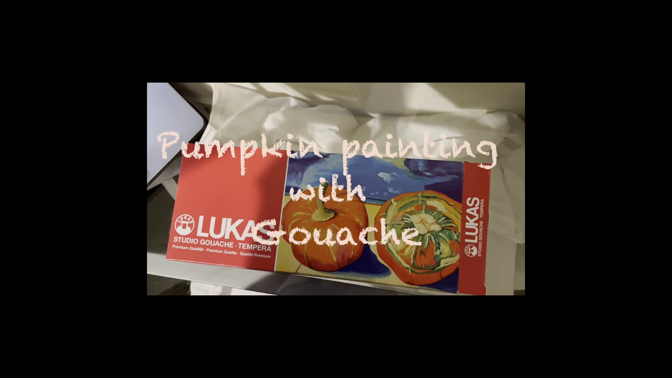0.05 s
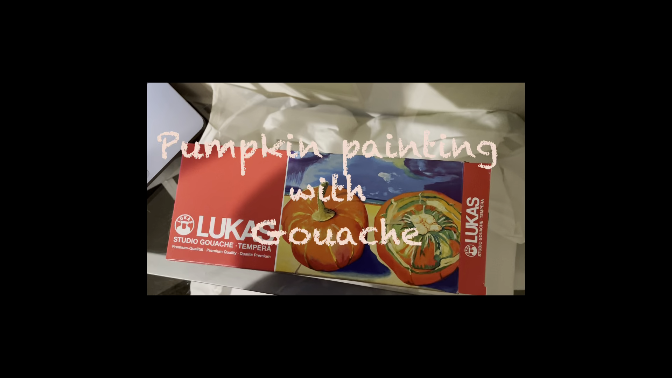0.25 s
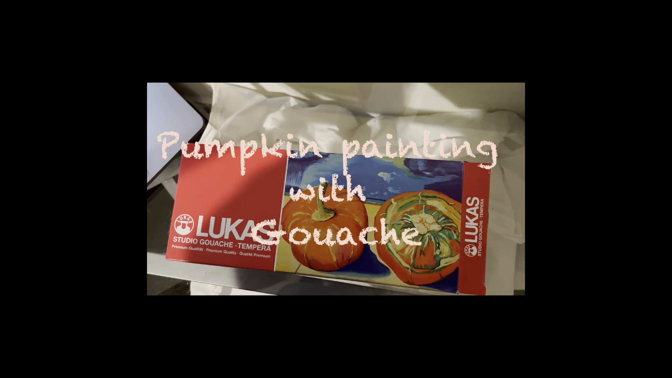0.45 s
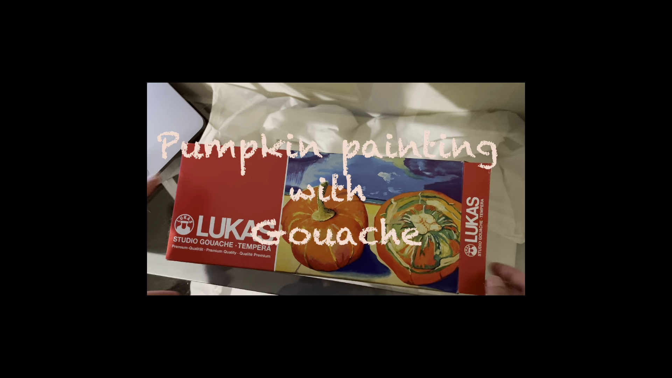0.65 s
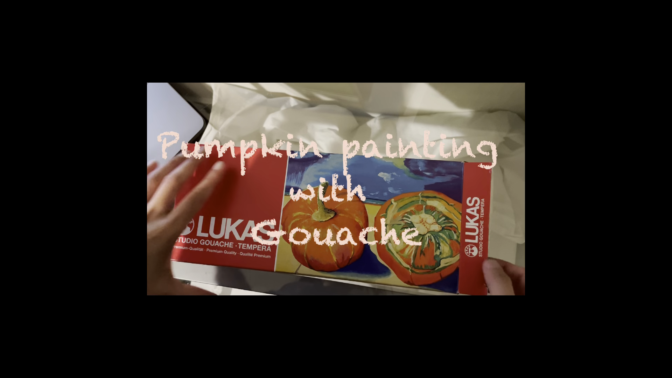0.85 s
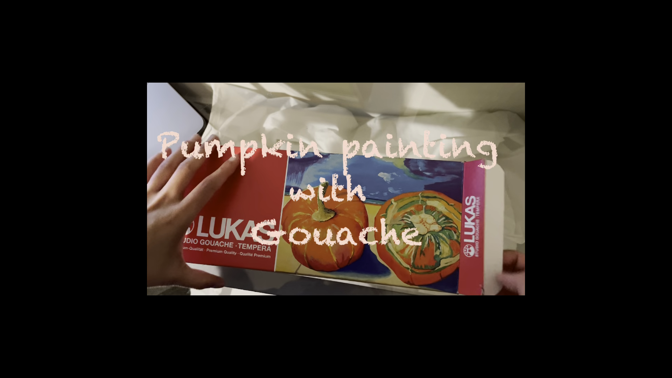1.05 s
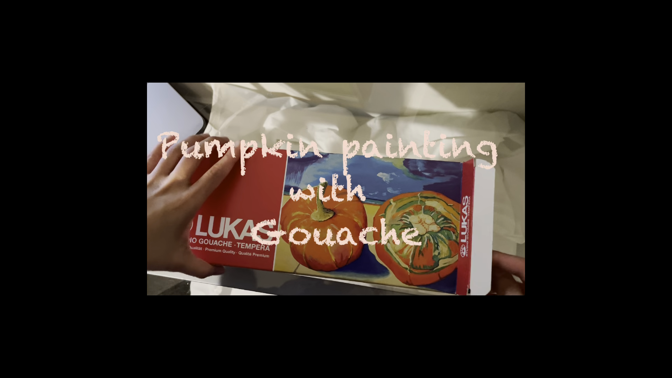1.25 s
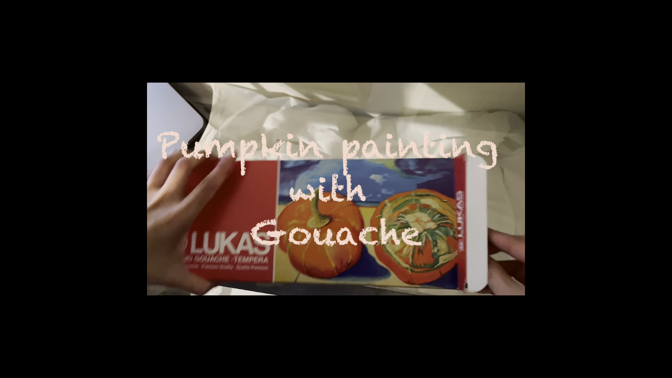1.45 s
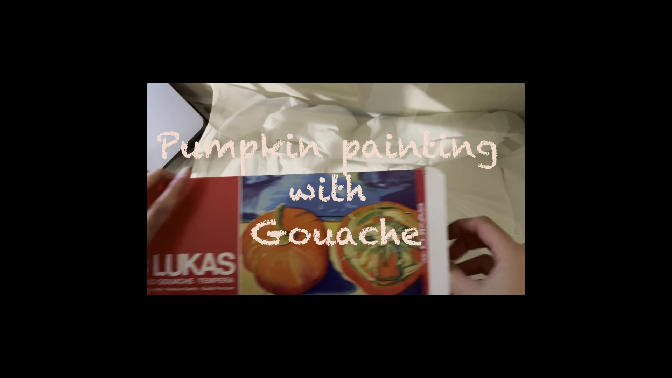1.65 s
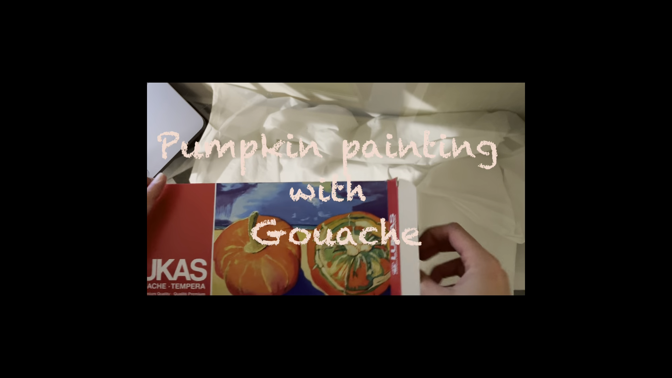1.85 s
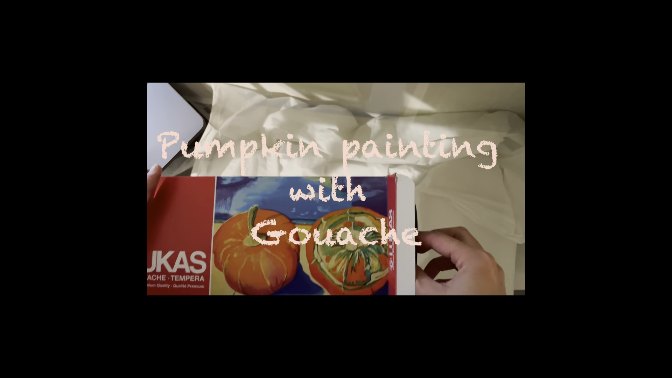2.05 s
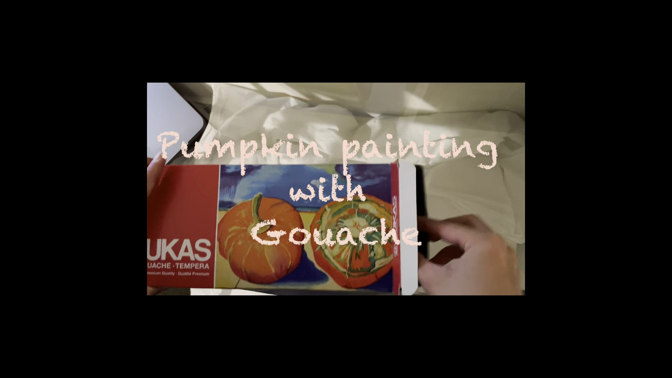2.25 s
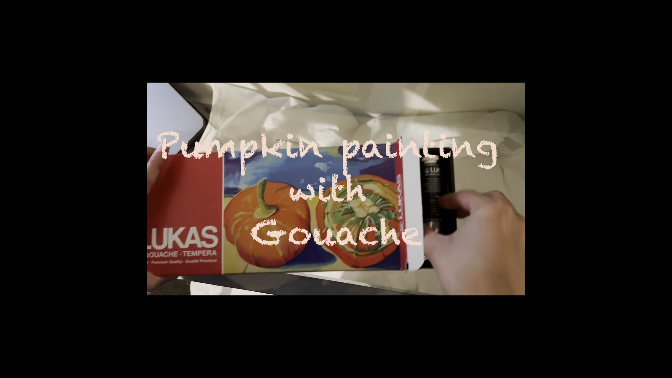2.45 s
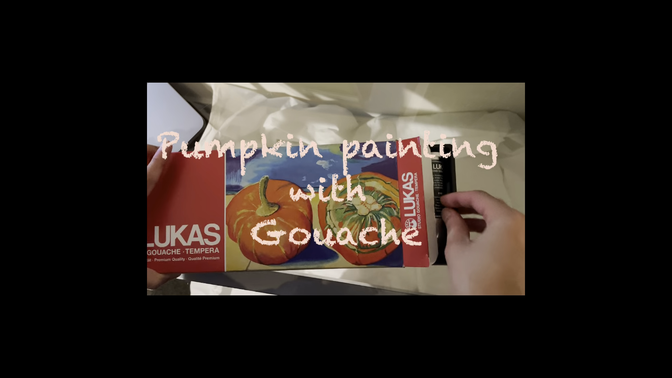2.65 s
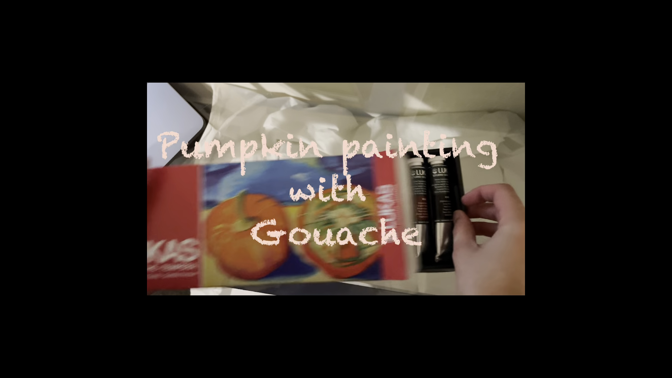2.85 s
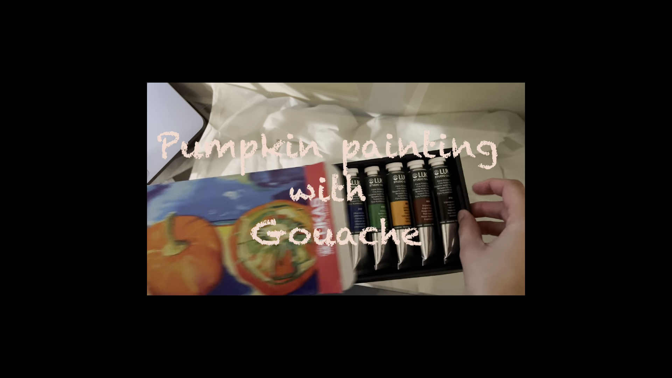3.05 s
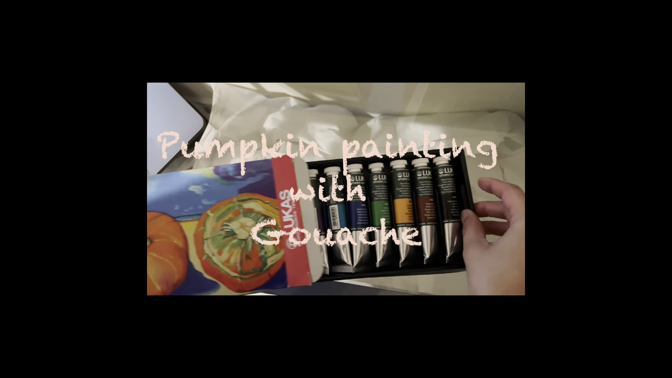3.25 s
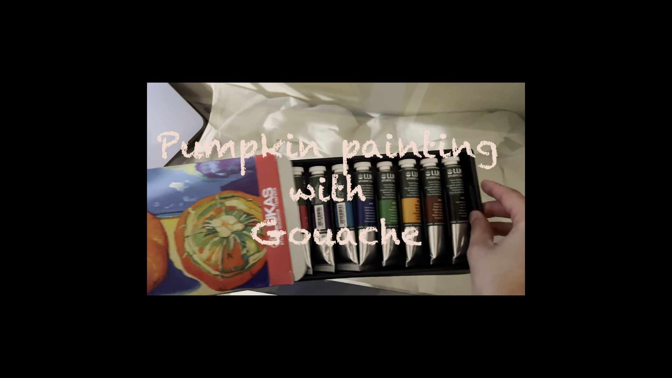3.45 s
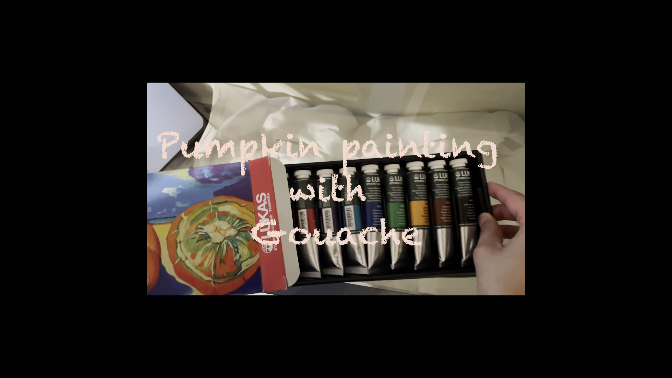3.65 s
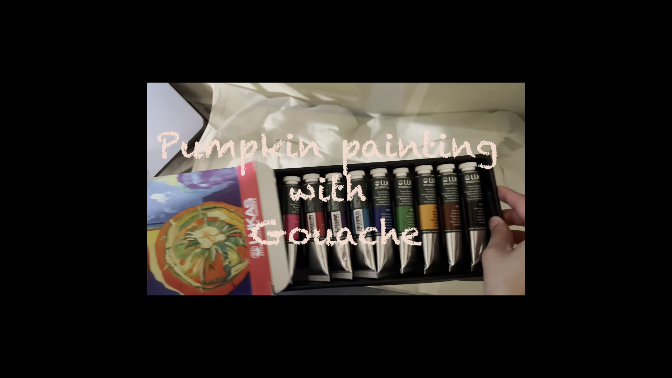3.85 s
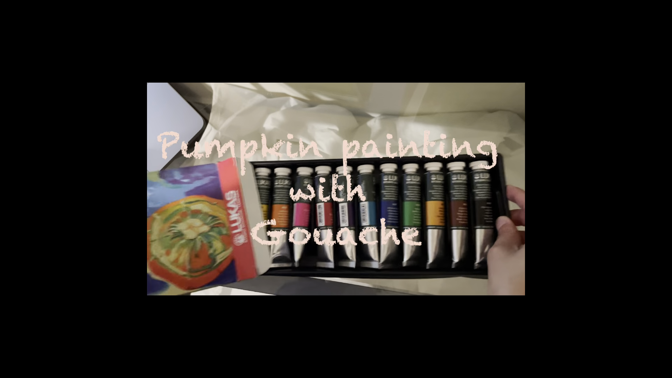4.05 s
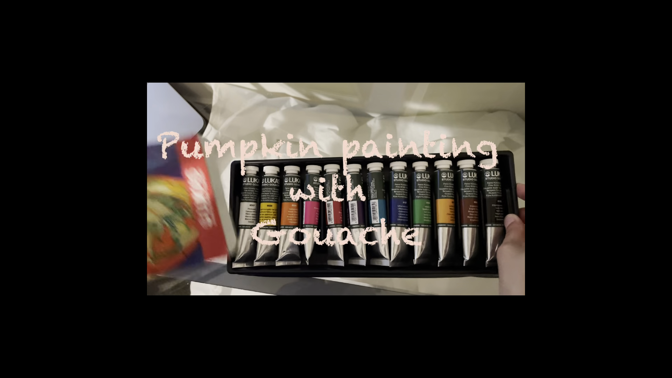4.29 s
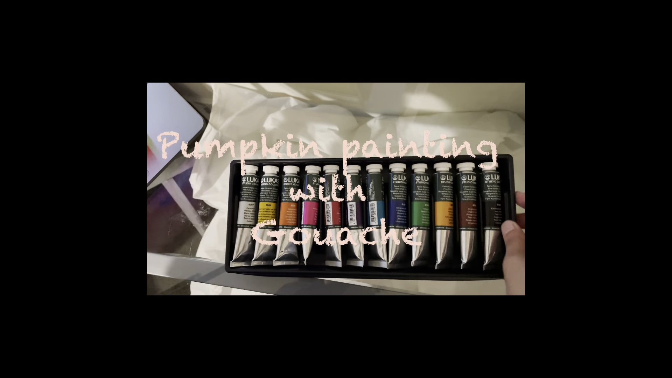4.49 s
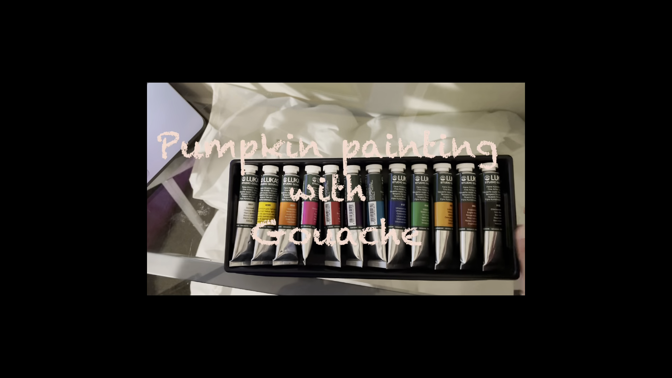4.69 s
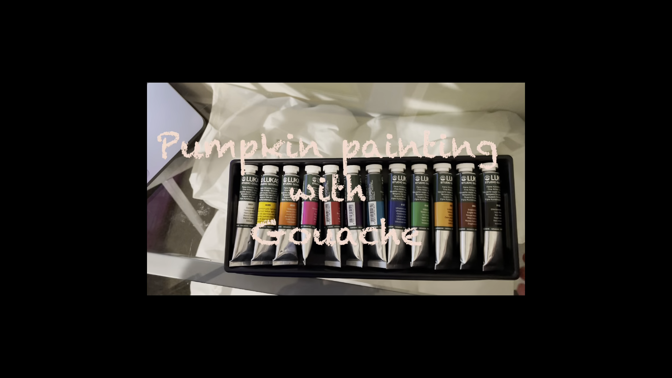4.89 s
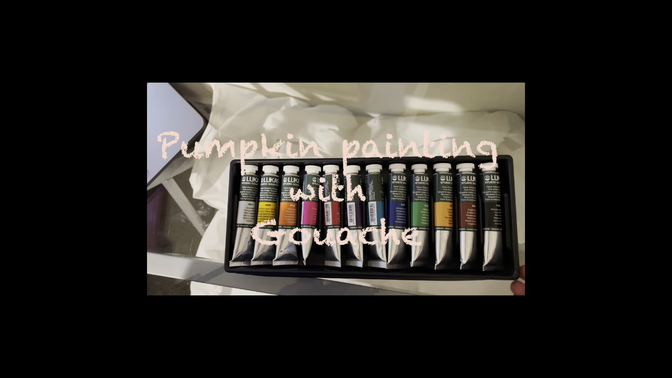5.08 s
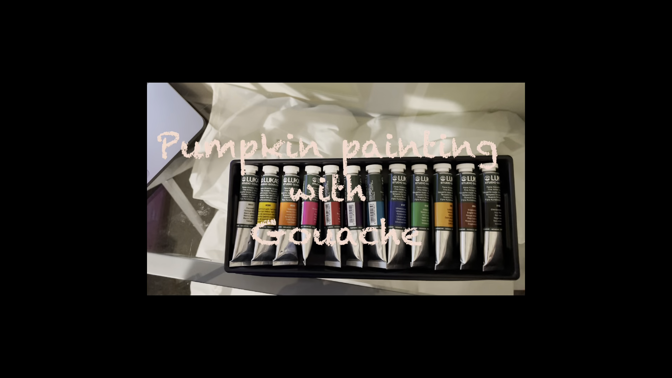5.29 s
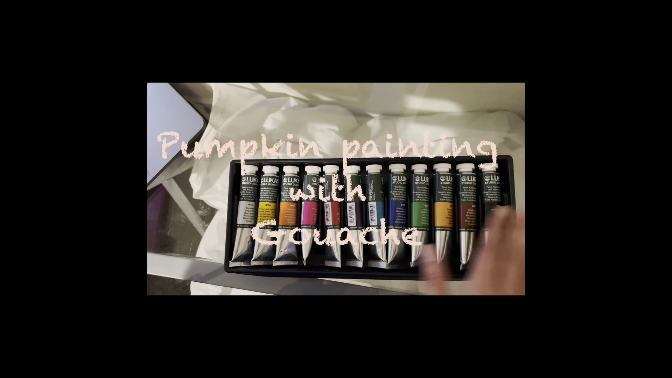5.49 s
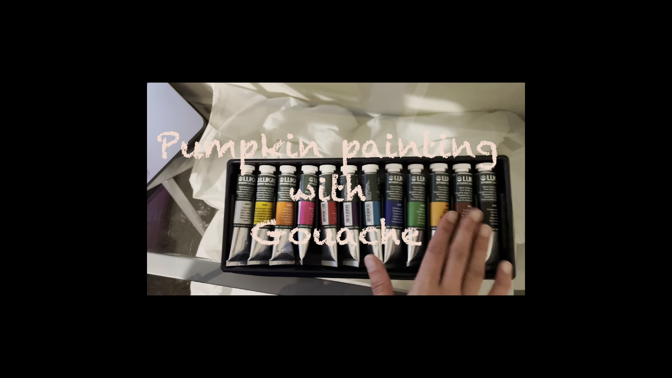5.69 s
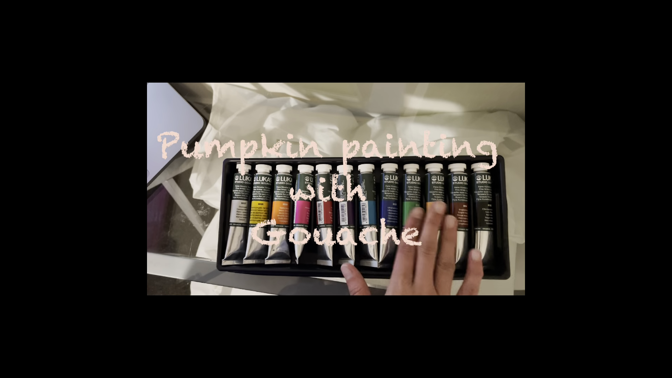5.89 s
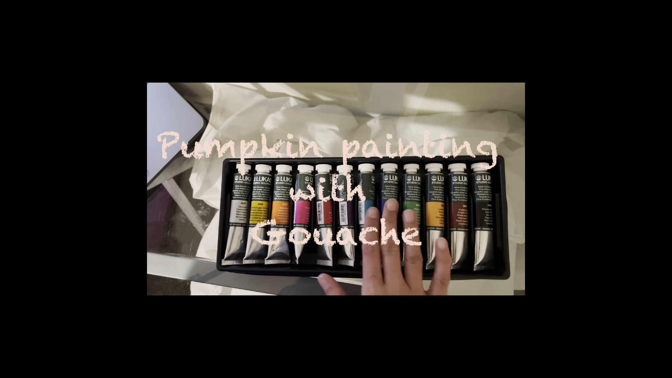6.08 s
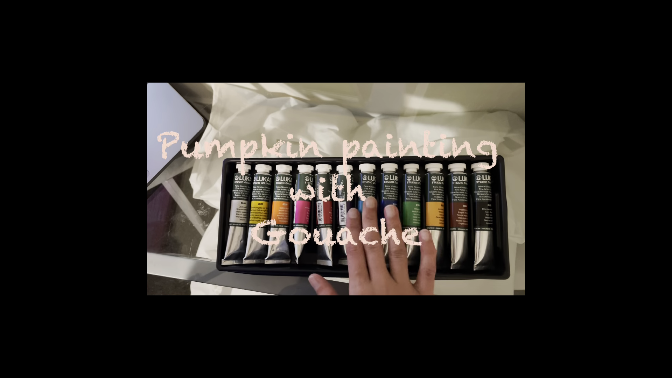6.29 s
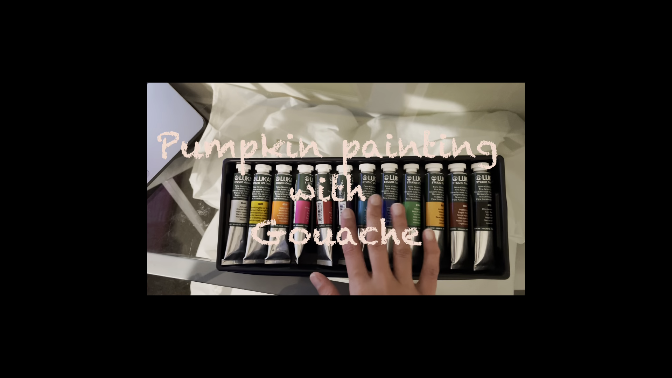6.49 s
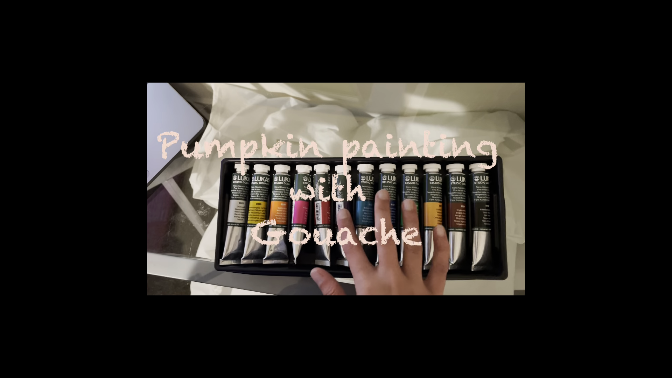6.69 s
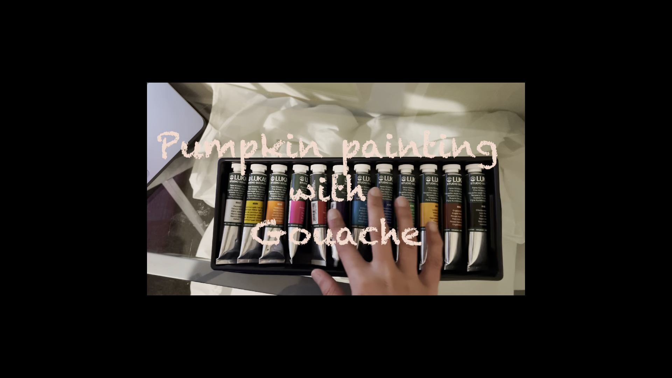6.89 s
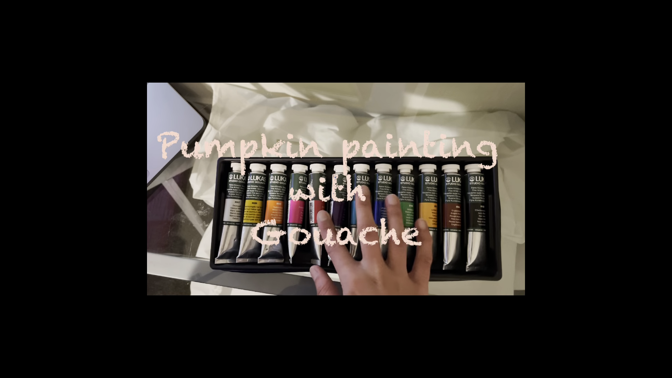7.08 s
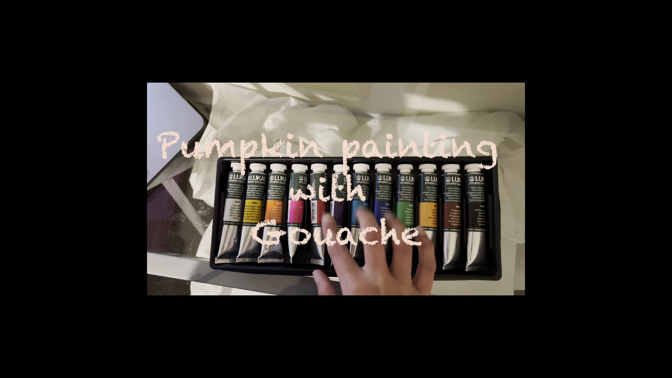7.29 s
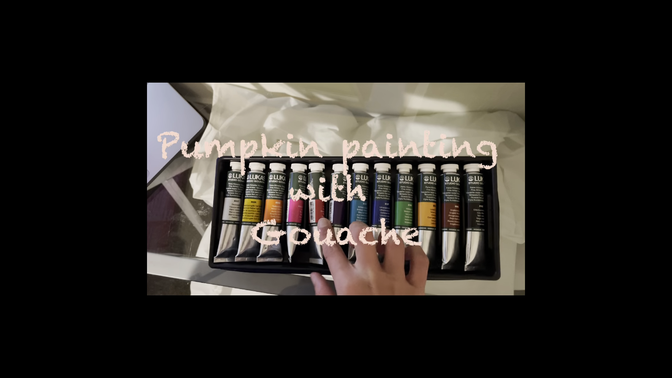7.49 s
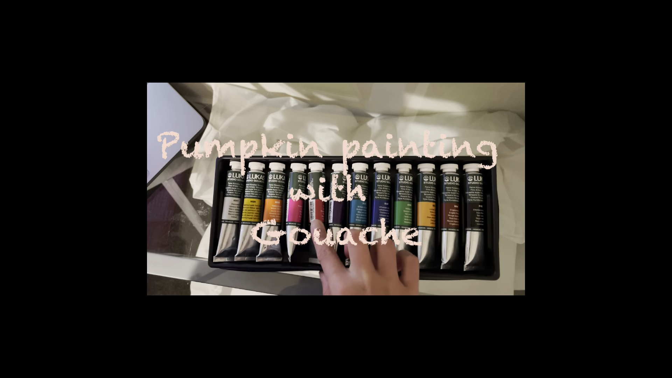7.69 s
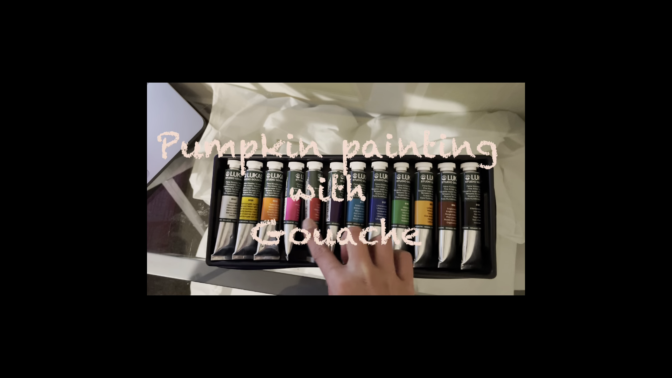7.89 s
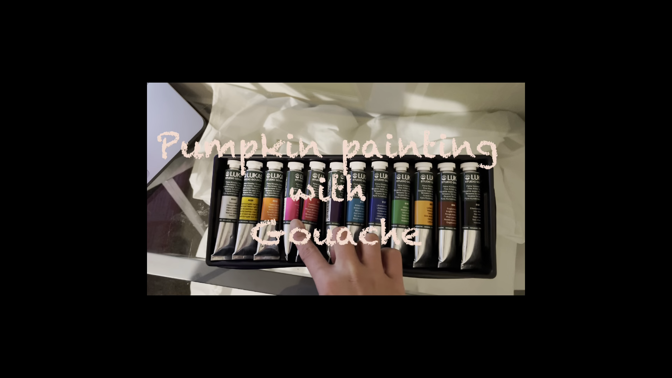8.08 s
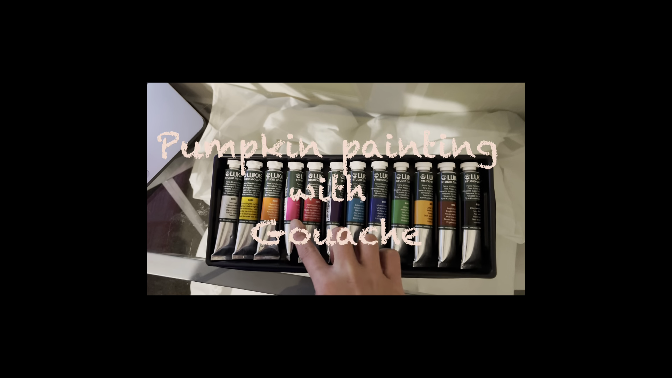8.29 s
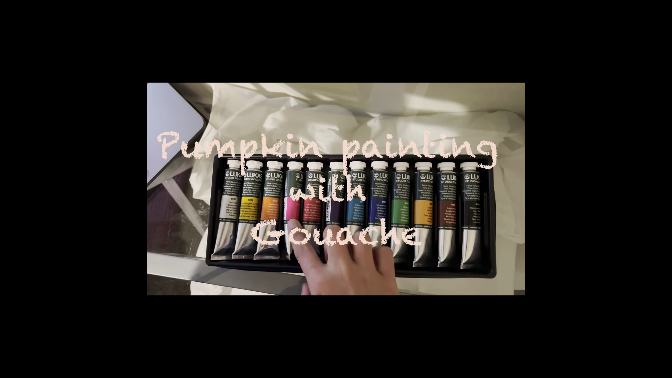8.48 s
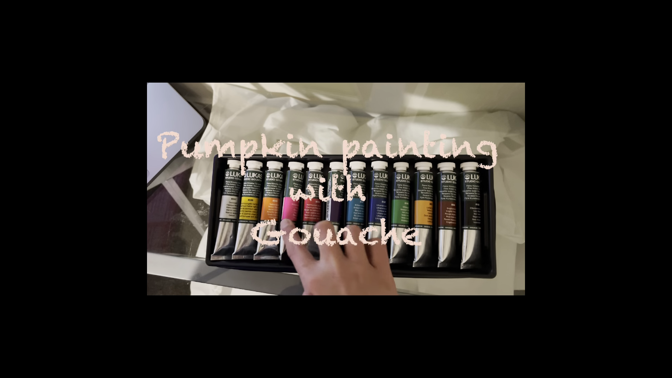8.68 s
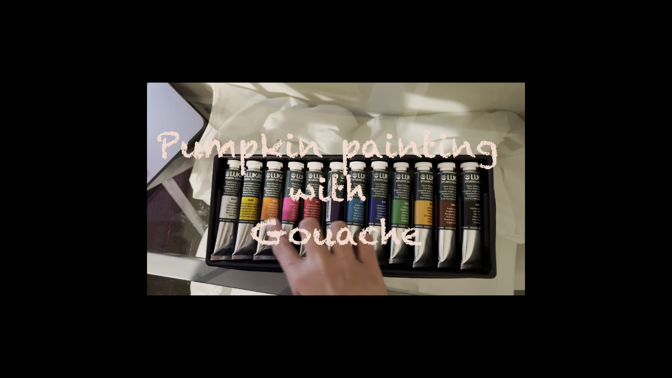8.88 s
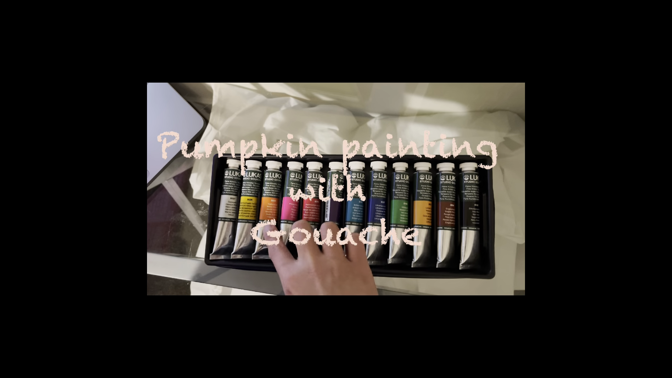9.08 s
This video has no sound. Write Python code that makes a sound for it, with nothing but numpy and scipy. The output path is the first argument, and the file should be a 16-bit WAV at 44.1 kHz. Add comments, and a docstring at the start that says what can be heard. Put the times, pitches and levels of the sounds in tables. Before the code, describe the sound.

Close to the microphone in a quiet room, a cardboard flap is worked open with soft rubbing and a few snaps. A tray of paint tubes is then dragged from the sleeve with a loud, uneven rasp that turns hollow, ending in several quick knocks. Afterwards come scattered light taps, clicks and faint finger squeaks on the tubes, one clacking into its slot, over low room tone and a brief faint hum.

```python
"""A cloth-covered table in a quiet room, one microphone close to the hands.
A plastic tray of paint tubes is pulled from its cardboard sleeve. The end flap is picked open; the
tray scrapes out in a few pulls, driving the panels of a sleeve that turns hollow, and knocks free.
Then fingers brush and squeak over the tubes and tap them in their slots, ringing tray and table.
Behind it lie a low room tone and, now and then, a faint hum."""
import sys
import numpy as np
from scipy import signal
from scipy.fft import rfft, irfft
from scipy.io import wavfile

SR = 44100
rng = np.random.default_rng(int(sys.argv[2]) if len(sys.argv) > 2 else 0)


def wav_record(signal):
    """Record a signal, one row per channel, as 16-bit PCM in the file named by sys.argv[1]."""
    frames = np.transpose(np.atleast_2d(signal))
    bounded = np.clip(frames, -1, 1)
    # unit amplitude maps onto the largest positive 16-bit level
    quanta = np.round(bounded * 32767).astype(np.int16)
    wavfile.write(sys.argv[1], SR, quanta)


N = 403074
TIME = np.arange(N) / SR

# taps on the tubes: t/s, knock level/dB, tick level/dB, ring f/Hz
TUBE_TAPS = [(4.473, -59, -57.5, 2960), (5.589, -50, -49, 4550), (5.68, -38.5, -32, 2030),
             (5.753, -52, -54, 2600), (5.853, -53.5, -61.5, 4050), (6.013, -48.5, -54, 3600),
             (6.024, -45.5, -61, 1010), (6.176, -40, -44.5, 963), (6.357, -70, -69, 6000),
             (7.192, -53, -47.5, 1910), (7.565, -58, -57.5, 5870), (8.175, -39, -43.5, 1250),
             (8.274, -65, -56, 7000), (8.723, -72, -54.5, 9600), (8.964, -56.5, -60.5, 1510)]
# resonances of the tray and its tubes: f/Hz, width/Hz, level/dB
TRAY_MODES = [(1012, 40, -3), (1443, 89, 6), (1960, 120, 0.5), (2290, 90, 1.5), (2900, 170, 6),
              (3800, 140, 2.5), (5600, 180, 2)]
# spectra of a blow's dull knock and sharp tick: f/Hz, level/dB
KNOCK_SPECTRUM = [(150, -14.5), (300, -3), (500, 0), (900, -0.5), (1500, 0.5), (2300, -4), (3500, -21.5),
                  (8000, -44)]
TICK_SPECTRUM = [(700, -51.5), (1800, -8), (3200, 3.5), (5000, -2.5), (8000, -8), (11000, -11.5),
                 (16000, -24.5)]


def from_db(db):
    """Decibels to gain."""
    return 10 ** (np.asarray(db) / 20)


def unit_rms(x):
    """Scale to unit power."""
    return x / np.sqrt(np.mean(x ** 2) + 1e-20)


def gain_curve(points):
    """Gain over time through rows of t/s, level/dB."""
    times, db = np.transpose(points)
    return np.interp(TIME, times, from_db(db))


def ease(x):
    """Smooth step from 0 to 1."""
    return np.sin(np.pi / 2 * np.clip(x, 0, 1)) ** 2


def drift(rate_hz, hop=40):
    """Slow random wander with a spread of about 1."""
    pole = np.exp(-2 * np.pi * hop * rate_hz / SR)
    noise = rng.standard_normal(N // hop + 2002)
    slow = signal.lfilter([1], [1, -2 * pole, pole * pole], noise)[2000:]
    return np.interp(np.arange(N) / hop, np.arange(len(slow)), unit_rms(slow))


def colour(x, spectrum, modes, ripple_db=0, ripple_hz=130, size=8192):
    """A body's response at unit power: broad spectrum, main resonances, a ripple of lesser ones."""
    f = np.maximum(np.arange(size // 2 + 1) * SR / size, 1)
    hz, db = np.transpose(spectrum)
    broad_db = np.interp(np.log(f), np.log(hz), db)
    peaks = sum(from_db(2 * peak_db) / (1 + (2 * (f - centre) / width) ** 2)
                for centre, width, peak_db in modes)
    ripple = np.interp(f / ripple_hz, np.arange(512), rng.standard_normal(512)) * f / (f + 2500)
    gain = unit_rms(from_db(broad_db + ripple_db * ripple) * np.sqrt(1 + peaks))
    # minimum phase, so the ring follows the blow
    cepstrum = irfft(np.log(gain + 1e-9))
    cepstrum[1:size // 2] *= 2
    cepstrum[size // 2 + 1:] = 0
    return signal.oaconvolve(x, irfft(np.exp(rfft(cepstrum))))[:len(x)]


def friction(per_s, size_db, hiss, judder_db, judder_hz):
    """Fibres catch and let go: tiny uneven slips over a smooth hiss, swelling in clumps."""
    sizes = from_db(size_db * np.minimum(rng.exponential(1, N), 5)) * rng.choice([-1, 1], N)
    slips = unit_rms(sizes * (rng.random(N) < per_s / SR))
    drag = slips + hiss * rng.standard_normal(N)
    return unit_rms(drag * from_db(judder_db * drift(judder_hz)))


def blows(times, levels_db, rises, decays, rings_hz, snap, rattle_db, rattle_s, size=8000):
    """Each blow builds up, snaps, then settles with a crunch and a weak rattle; the struck spot rings."""
    out, lead = np.zeros(N + size), size // 4
    t = (np.arange(size) - lead) / SR
    for at, db, rise, decay, hz in zip(times, levels_db, rises, decays, rings_hz):
        build_up = np.exp(-abs(t) / max(rise, 1e-4))
        settling = np.exp(-abs(t) / max(decay, 1e-4))
        rattle = from_db(rattle_db) * np.exp(-abs(t) / rattle_s)
        burst = rng.standard_normal(size) * np.where(t < 0, build_up, settling + rattle)
        burst[lead] += snap * np.linalg.norm(burst)
        ring = (from_db(6.5) - 1) * signal.lfilter(*signal.iirpeak(hz, Q=2.5, fs=SR), burst)
        start = int(at * SR) - lead
        out[start:start + size] += from_db(db) * (burst + ring) / np.linalg.norm(burst)
    return out[:N] * np.sqrt(.01 * SR)  # a burst's level is its rms over 10 ms


def strokes(rows, spectrum, drag, ring_db, ring_q, shift_oct, size=32768):
    """Each stroke swells and fades a little more slowly; the pressed spot's ring shifts upward."""
    out, t = np.zeros(N + size), (np.arange(size) - size // 2) / SR
    for at, swell_s, db, hz in rows:
        start = int(at * SR) - size // 2
        travel = t / (swell_s * np.where(t < 0, 1, 1.08))
        rub = drag.take(start + np.arange(size), mode="wrap") * np.exp(-travel ** 2) * from_db(db)
        passed = (1 + np.tanh(2 * travel)) / 2
        for share, spot_hz in ((1 - passed, hz / 2 ** shift_oct), (passed, hz * 2 ** shift_oct)):
            spot = [(spot_hz, spot_hz / ring_q, ring_db)]
            out[start:start + size] += colour(rub * share, spectrum, spot, ripple_db=4.2, ripple_hz=280)
    return out[:N]


def room_tone():
    """The quiet room: a low, nearly steady wash of noise."""
    spectrum = [(15, -57), (25, -35), (53, -2), (130, 4), (170, 0.5), (242, -5), (335, -8.5), (624, -10),
                (887, -5.5), (1040, -7), (1480, -8), (1650, -11.5), (2610, -18), (3250, -34.5),
                (16000, -63)]  # colour of the air: f/Hz, level/dB
    modes = [(241.1, 9, 13), (900, 80, -11), (1530, 130, -6.5)]  # its resonances: f/Hz, width/Hz, level/dB
    loudness = [(0, -53), (2, -52.5), (5.2, -56), (6, -54), (9.14, -55)]  # its slow rise and fall: t/s, level/dB
    return colour(rng.standard_normal(N), spectrum, modes) * gain_curve(loudness)


def faint_hum():
    """Soft, wavering low tones swell and sink back into the room tone."""
    tones = [(5.693, 6.452, 284.4, -56.5), (7.073, 7.18, 222, -47), (7.687, 7.896, 260.5, -54)]  # spells of hum: start t/s, end t/s, f/Hz, level/dB
    wavering_time = np.cumsum(1 + 0.013 * drift(6.5)) / SR
    out = np.zeros(N)
    for start, end, hz, db in tones:
        progress = np.clip((TIME - start) / (end - start), 0, 1)
        swell = np.sqrt(abs(np.sin(np.pi * progress)))
        out += from_db(db) * swell * np.sin(2 * np.pi * hz * wavering_time)
    return out


def reflections(x, wet_db, t60_s, wall_hz, size=16384):
    """The direct sound, followed by a faint, dull tail scattered from the walls."""
    t = np.arange(size) / SR
    tail = rng.standard_normal(size) * from_db(-60 * t / t60_s) * (t > .005)
    tail = signal.sosfilt(signal.butter(1, wall_hz, fs=SR, output="sos"), tail)
    return x + from_db(wet_db) * signal.oaconvolve(x, tail / np.linalg.norm(tail))[:N]


def table_and_tray_bumps():
    """Soft pushes ring table and tray: from the box, and just after each tap on the tubes."""
    box_bumps = [(1.081, -42.5), (4.029, -35.5), (4.058, -38.5), (4.167, -47.5), (4.283, -50)]  # box meeting the table: t/s, level/dB
    # resonances of the table and the tray lying on it: f/Hz, width/Hz, level/dB
    modes = [(106, 40, 5.5), (211.7, 12, -4.5), (254.2, 14, 1), (534, 65, -3.5), (963, 27, -2.5)]
    tap_bumps = [(at + .005, knock_db - 2) for at, knock_db, *_ in TUBE_TAPS]
    times, db = np.transpose(box_bumps + tap_bumps)
    out = np.zeros(N)
    for hz, width, mode_db in modes:
        pushes = np.full(N, 1e-18)
        pushes[(times * SR).astype(int)] = from_db(db + mode_db + rng.normal(0, 1.6, len(times)))
        pole, cosine = np.exp(-np.pi * width / SR), np.cos(2 * np.pi * hz / SR)
        out += signal.lfilter([1, -pole * cosine], [1, -2 * pole * cosine, pole * pole], pushes)
    return signal.sosfilt(signal.butter(2, 70, "high", fs=SR, output="sos"), out)


def fingers():
    """Skin drags over card and tubes with dry crackles, sticks and squeaks, and rustles as it grips."""
    # spectra of skin on card and on tubes: f/Hz, level/dB
    card_skin = [(250, -24.5), (600, 5.5), (950, 1), (1700, -1), (2900, -4.5), (5900, -5.5), (10200, -11.5),
                 (12500, -18.5), (16000, -19)]
    tube_skin = [(400, -15.5), (1200, -6), (2300, 0), (3500, -2), (5500, -8), (8000, -14), (10500, -13.5),
                 (13000, -23), (16000, -21.5)]
    # finger movements: peak t/s, swell/s, level/dB, ring f/Hz
    card_strokes = [(.664, 0.01, -61, 1200), (.935, 0.052, -53.5, 9000), (1.04, 0.019, -50, 1500),
                    (1.205, 0.024, -50, 3000), (1.28, 0.04, -51, 9600), (1.41, 0.11, -55, 1790),
                    (1.565, 0.054, -50, 1010), (1.612, 0.013, -49, 2300), (1.645, 0.032, -52.5, 4300),
                    (1.98, 0.019, -50.5, 5370), (2.52, 0.083, -49, 4450), (2.684, 0.017, -48, 4600),
                    (4.21, 0.098, -50.5, 3050)]
    tube_strokes = [(4.56, 0.052, -60, 3840), (4.68, 0.046, -59, 2700), (5.018, 0.073, -66.5, 4700),
                    (5.74, 0.16, -64.5, 3770), (6.067, 0.025, -55.5, 2950), (6.122, 0.013, -45, 2700),
                    (6.162, 0.021, -39.5, 1790), (6.628, .018, -66, 11000), (6.88, 0.1, -58.5, 11400),
                    (7.298, 0.019, -61.5, 5000), (7.405, 0.015, -64, 6000), (7.51, 0.043, -59, 3420),
                    (7.78, 0.15, -60.5, 5400), (8.009, 0.042, -55, 2380), (8.12, 0.021, -56, 4930),
                    (8.172, 0.009, -34.5, 6260), (8.247, 0.028, -56, 3850), (8.63, .045, -56, 10000),
                    (8.823, 0.015, -48, 5800)]
    sticky_strokes = [(1.63, 0.062, -51, 2840), (1.88, 0.032, -48, 2820), (4.56, 0.042, -54, 2870),
                      (7.72, 0.031, -63.5, 5450), (7.924, 0.022, -43, 2200)]
    grip = [(.2, -71.5), (.7, -66), (1.2, -53.5), (4.5, -59), (4.8, -88), (6.5, -82), (7.6, -68),
            (8.4, -77.5), (9.14, -68)]  # rustle of the holding hands: t/s, relative level/dB
    crackle = friction(per_s=300, size_db=1.8, hiss=0, judder_db=2.5, judder_hz=15)
    card_grain = friction(per_s=3000, size_db=2.6, hiss=1, judder_db=1.4, judder_hz=40)
    tube_grain = friction(per_s=3000, size_db=2.3, hiss=1, judder_db=1.4, judder_hz=40)
    card_drag = unit_rms(card_grain + .55 * crackle)
    tube_drag = unit_rms(tube_grain + .35 * crackle)
    on_card = strokes(card_strokes, card_skin, card_drag, ring_db=5.5, ring_q=2, shift_oct=.12)
    on_tubes = strokes(tube_strokes, tube_skin, tube_drag, ring_db=3.5, ring_q=12, shift_oct=.12)
    squeaks = strokes(sticky_strokes, tube_skin, tube_drag, ring_db=18, ring_q=26, shift_oct=.01)
    rustle = colour(tube_drag[::-1] * gain_curve(grip), tube_skin, TRAY_MODES) * from_db(-5.5)
    return on_card + on_tubes + squeaks + rustle


def tube_taps():
    """Tapped tubes knock in the thin tray: a nail is short and bright, flesh long and dull."""
    times, knock_db, tick_db, ring_hz = np.transpose(TUBE_TAPS)
    decay = 0.0047 * 2 ** ((knock_db - tick_db) / 9)  # doubles for each 9 dB of knock over tick
    rise = np.full(len(times), 0.0019)
    knock = blows(times, knock_db, rise, decay * 3.1, ring_hz, snap=.13, rattle_db=-6, rattle_s=.0082)
    tick = blows(times, tick_db, rise, decay, ring_hz, snap=.72, rattle_db=-21.5, rattle_s=.038)
    dull = colour(knock, KNOCK_SPECTRUM, TRAY_MODES)
    return dull + colour(tick, TICK_SPECTRUM, TRAY_MODES, ripple_db=2.5)


def loose_tube(at_s, db, ring_hz):
    """Under a fingertip one tube drops into its slot with a hollow clack."""
    modes = [(512, 35, 25.5), (1990, 250, 22.5), (2640, 160, 23.5)]  # the tube's resonances: f/Hz, width/Hz, level/dB
    clack = blows([at_s], [db], [.0008], [.0025], [ring_hz], snap=1.5, rattle_db=-22, rattle_s=.01)
    return colour(clack, KNOCK_SPECTRUM, modes)


def tray_drop(at_s, db, hz, t60_s):
    """Clear of the sleeve, the tray drops on the table and its floor rings hollow."""
    age = np.maximum(TIME - at_s, 0)
    return from_db(db - 60 * age / t60_s) * np.sin(2 * np.pi * hz * age)


def card_knocks():
    """A dull knock and a dry tick on the sleeve: sudden when card snaps, slower when an edge skids."""
    # flap and tray striking: t/s, knock level/dB, tick level/dB, base rise/s, base decay/s, ring f/Hz
    hits = [(.671, -48.5, -57, 0.0037, .006, 690), (.908, -45, -56, .004, .012, 640),
            (1.018, -48, -54, .001, 0.0058, 1490), (1.075, -38, -38.5, 0.0014, 0.0022, 1590),
            (1.35, -35.5, -39.5, 0.00032, 0.0012, 1620), (1.373, -50, -56, 0.0012, .003, 1750),
            (1.427, -43.5, -46, .0005, 0.0067, 3100), (1.448, -46.5, -49.5, 0.00082, 0.0022, 3200),
            (1.544, -45, -63, .001, 0.026, 1110), (1.791, -44.5, -51, .001, 0.019, 1100),
            (2.355, -34.5, -35.5, 0.00089, 0.0092, 5400), (2.398, -50, -42.5, 0.00073, 0.002, 9200),
            (2.589, -36.5, -46, .001, 0.0073, 605), (2.607, -26, -33.5, 0.00015, 0.0046, 1550),
            (2.616, -30, -55, 0.0023, 0.0042, 620), (3.223, -40.5, -59, .002, 0.0044, 1050),
            (3.881, -28.5, -33.5, 0.0039, 0.004, 2800), (4.016, -39, -33, .002, .002, 1800),
            (4.032, -26.5, -35, 0.00083, 0.0065, 2180), (4.071, -31.5, -36.5, .005, 0.0077, 3400),
            (4.124, -39, -30.5, 0.0019, 0.0077, 4500), (4.164, -30.5, -43, .0002, .005, 1010),
            (4.2794, -35, -38, 0.0001, 0.0027, 2740)]
    modes = [(408, 14, 7.5), (634, 70, 1.5), (1010, 42, 3.5), (1480, 120, -5.5), (1720, 140, -1.5),
             (2330, 130, -2)]  # the sleeve damped by the hand: f/Hz, width/Hz, level/dB
    times, knock_db, tick_db, rise, decay, ring_hz = np.transpose(hits)
    knock = blows(times, knock_db, rise * .7, decay * 1.3, ring_hz,
                  snap=.55, rattle_db=-16.5, rattle_s=.0078)
    tick = blows(times, tick_db, rise, decay * .39, ring_hz, snap=.22, rattle_db=-15.5, rattle_s=.015)
    dull = colour(knock, KNOCK_SPECTRUM, modes, ripple_db=-1.5)
    return dull + colour(tick, TICK_SPECTRUM, modes, ripple_db=3)


def pull_strength(pulls, start_up_s=0.1, stop_s=0.087):
    """Each pull gets going, gains or loses speed steadily and stops."""
    strength = np.zeros(N)
    for start, end, first_db, last_db, _ in pulls:
        speed = from_db(np.interp(TIME, [start, end], [first_db, last_db]))
        strength += speed * ease((TIME - start) / start_up_s) * ease((end - TIME) / stop_s)
    return strength


def sliding_tray():
    """Slips drive the panels and rasp at the edge; the sleeve rings hollow as the tray leaves it."""
    # pulls on the tray: start t/s, end t/s, first level/dB, last level/dB, relative rasp level/dB
    pulls = [(2.062, 2.22, -48, -46.5, -3), (2.144, 2.401, -50.5, -26.5, -0.5),
             (2.706, 2.84, -30, -30.5, -8), (2.756, 3.009, -17, -30, -4.5),
             (2.928, 3.244, -26.5, -41, -2.5), (3.166, 3.38, -36, -40.5, -2),
             (3.31, 3.549, -43.5, -32.5, 0.5), (3.56, 3.824, -41, -39.5, -4), (3.758, 3.992, -33, -39, 1),
             (3.911, 4.158, -35.5, -42.5, 7)]
    # spectra of the pressed panels, the emptying sleeve and the rubbing edges: f/Hz, level/dB
    panel_spectrum = [(200, -32.5), (350, -26.5), (480, 0.5), (600, -4.5), (780, -6), (1100, -3),
                      (1300, 7.5), (1700, -7), (2400, -5), (4000, -29), (8000, -39)]
    hollow_spectrum = [(200, -20), (330, -6), (420, -8.5), (700, 7), (900, 0.5), (1300, 2.5), (2000, -10),
                       (3200, -5), (8000, -52.5)]
    rasp_spectrum = [(710, -21.5), (1200, -23), (1520, -3), (2020, 2.5), (2400, 1), (5470, -5.5),
                     (6580, -8), (15200, -22.5), (16000, -23.5)]
    # resonances of the cardboard and of the air inside: f/Hz, width/Hz, level/dB
    card_modes = [(404, 14, 5.5), (521, 15, 4), (583, 25, -0.5), (922, 24, 3.5), (1026, 18, 8),
                  (1220, 18, 3), (1321, 14, -2), (1407, 14, 4.5), (1570, 40, 0.5), (1900, 50, -3),
                  (2320, 28, -6), (2476, 20, -3.5), (3280, 40, -3)]
    cavity_modes = [(407, 16, 17.5), (661, 110, -3), (906, 20, 5.5), (1230, 36, 6), (1670, 35, 13.5),
                    (1920, 41, 20.5), (2056, 53, 4), (2260, 50, 10)]
    pull, usual_pull = pull_strength(pulls), from_db(-39.5)
    slips = friction(per_s=6000, size_db=2, hiss=.9, judder_db=.6, judder_hz=50) * pull
    hollow_share = np.interp(TIME, [2.93, 3.105], [0.092, 1])
    panels = colour(slips * np.sqrt(1 - hollow_share), panel_spectrum, card_modes) * from_db(-0.5)
    hollow = colour(slips * np.sqrt(hollow_share), hollow_spectrum, cavity_modes) * from_db(-2)
    bite = gain_curve([((start + end) / 2, rasp_db) for start, end, *_, rasp_db in pulls])
    rasp_gain = usual_pull * (pull / usual_pull) ** 0.96 * bite  # swings a little less than the pull
    rasp = friction(per_s=9000, size_db=1.6, hiss=.9, judder_db=1.5, judder_hz=35) * rasp_gain
    return panels + hollow + colour(rasp, rasp_spectrum, card_modes, ripple_db=1.2)


def scene():
    """Close, nearly dry handling over the room tone and hum, in mono."""
    handling = sliding_tray() + fingers() + card_knocks() + tube_taps()
    handling += loose_tube(at_s=5.6805, db=-32, ring_hz=2350)
    handling += table_and_tray_bumps()
    handling += tray_drop(at_s=4.176, db=-30, hz=945, t60_s=0.11)
    air = room_tone()
    return (reflections(handling, wet_db=-17, t60_s=0.16, wall_hz=4000) + air + faint_hum())[None]


def record(dry):
    """The microphone chain: a gentle bass roll-off and a steep cut at the very top."""
    low_cut = signal.butter(2, 45, "high", fs=SR, output="sos")
    high_cut = signal.ellip(10, .1, 70, 15900, fs=SR, output="sos")
    return signal.sosfilt(high_cut, signal.sosfilt(low_cut, dry))


dry = scene()
out = record(dry)
wav_record(out)
```